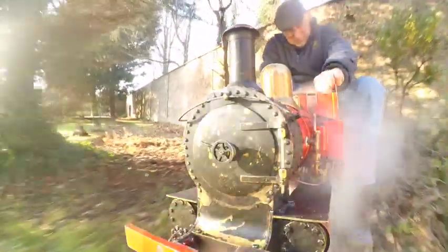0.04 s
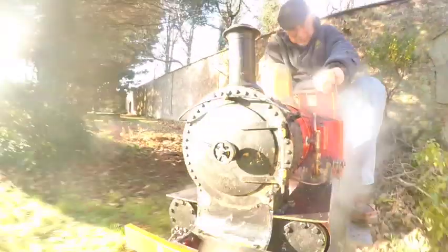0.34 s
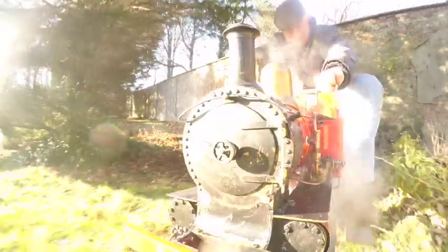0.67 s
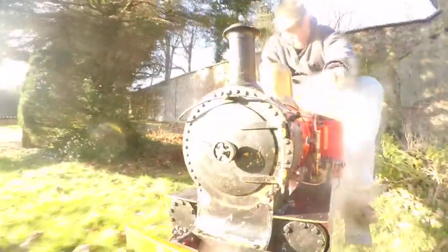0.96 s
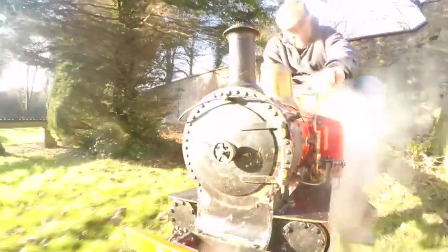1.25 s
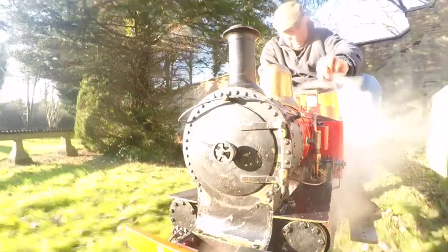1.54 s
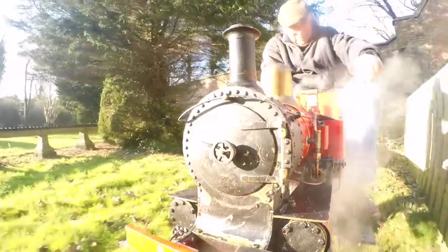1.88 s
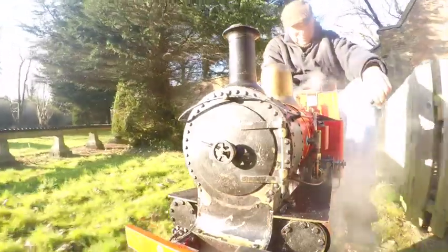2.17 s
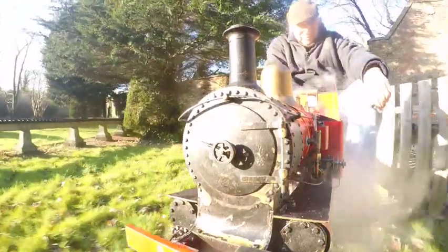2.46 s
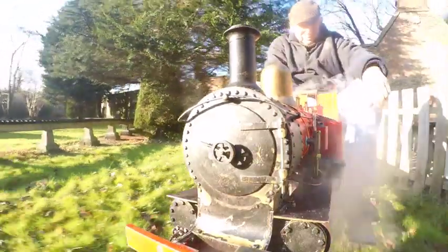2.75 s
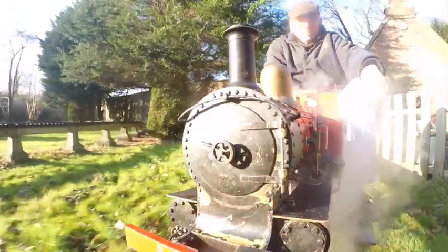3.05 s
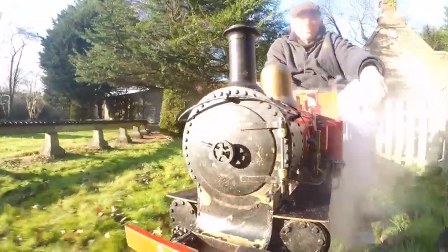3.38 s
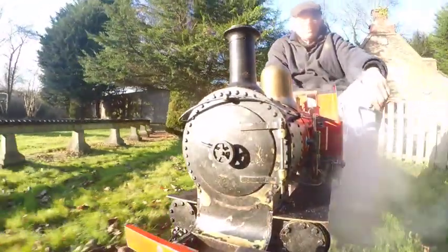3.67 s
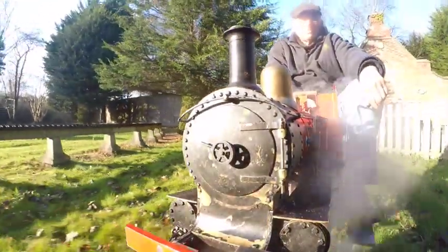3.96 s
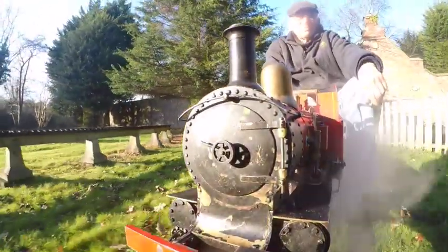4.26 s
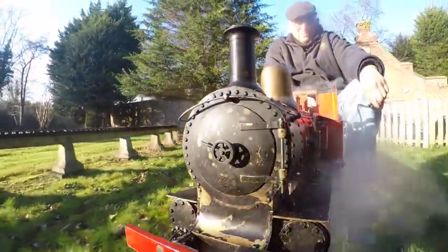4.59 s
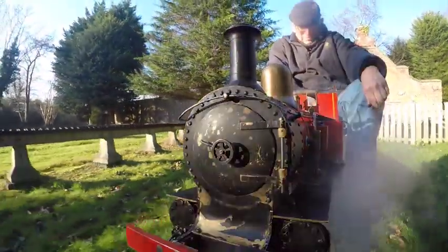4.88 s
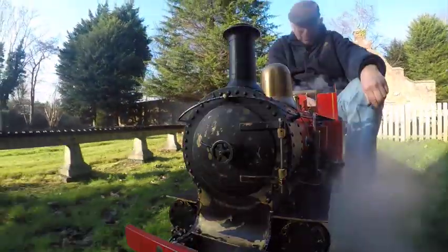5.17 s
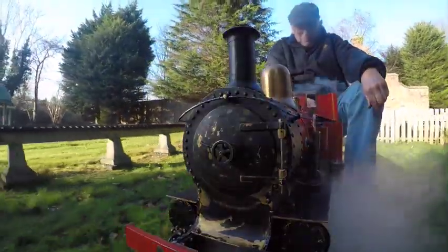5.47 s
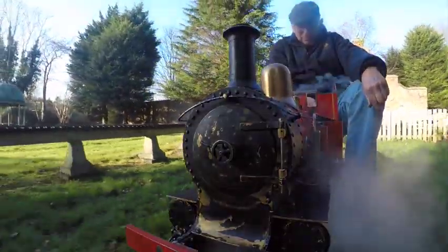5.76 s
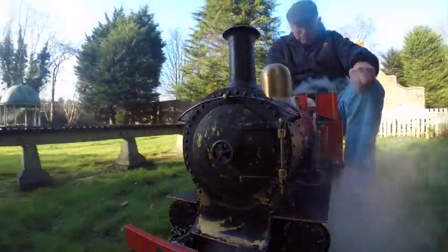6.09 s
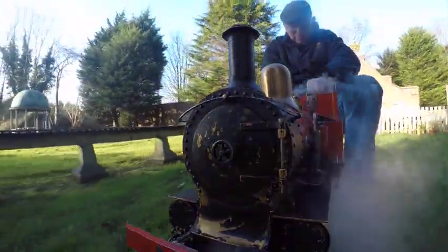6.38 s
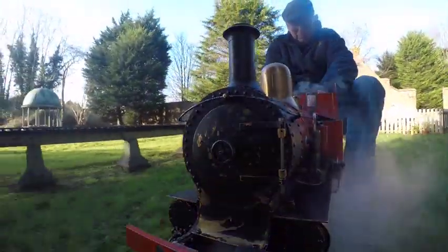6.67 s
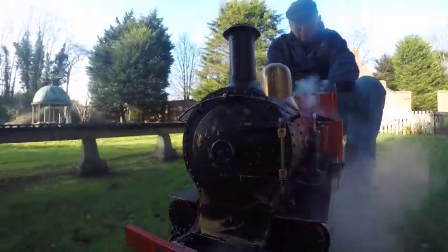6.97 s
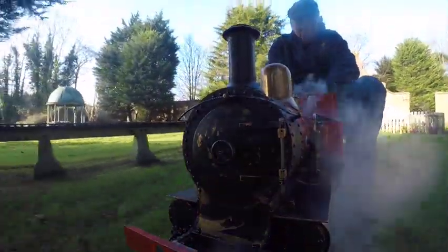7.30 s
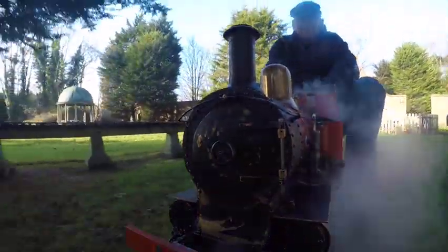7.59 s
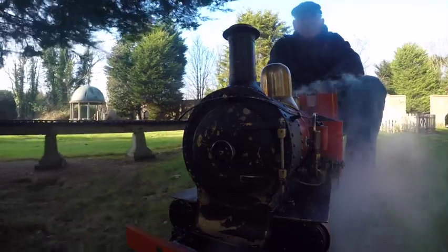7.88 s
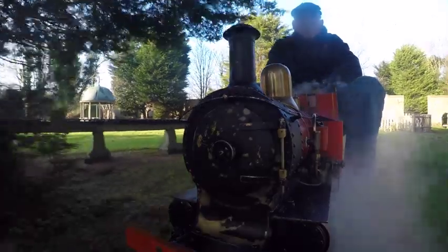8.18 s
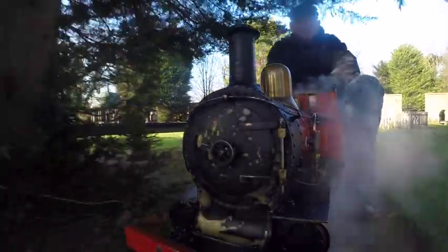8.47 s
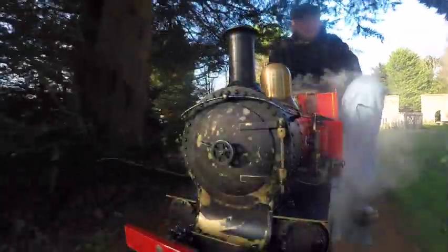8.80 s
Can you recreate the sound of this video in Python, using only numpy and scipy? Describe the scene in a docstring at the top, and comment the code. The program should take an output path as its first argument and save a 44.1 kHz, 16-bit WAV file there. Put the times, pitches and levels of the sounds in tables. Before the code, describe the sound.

A miniature steam locomotive runs along its track, heard very close from its front end. Its pistons knock in a quick, regular rhythm, with rods clanking and valve gear ticking between the beats. Wheels rumble underneath and steam hisses throughout. Bumps rock the engine and a loose fitting clinks now and then. The pace rises slightly, and the hiss swells twice near the end.

```python
"""A miniature steam locomotive runs along its track, heard from its front beam.
From the start, four beats to a wheel turn knock and shake the frame; between them the rods clank and
the valve gear ticks, over rumbling wheels and steam that hisses in time with the strokes.
After a second or so, bumps begin to rock the engine and loose fittings snap now and then.
By the end the pace has risen from about seven beats a second to over eight, and the hiss swells twice."""
import sys
import numpy as np
from scipy import signal
from scipy.fft import rfft, irfft
from scipy.io import wavfile
from scipy.ndimage import uniform_filter1d

SR = 44100
rng = np.random.default_rng(int(sys.argv[2]) if len(sys.argv) > 2 else 0)


def digitize_waveform(pressure):
    """Quantize a signal to 16-bit integers and store it at the path in sys.argv[1].

    Rows of a 2-D input are taken as channels; values are limited to [-1, 1].
    """
    field = np.atleast_2d(pressure).T
    bounded = np.clip(field, -1, 1)
    quanta = np.round(bounded * 32767).astype(np.int16)
    wavfile.write(sys.argv[1], SR, quanta)


N = 389844
TIME = np.arange(N) / SR
SIZE = 16384  # samples in an impulse response
FREQS = np.fft.rfftfreq(SIZE, 1 / SR)


# Modes of a stroke's bright first contact, its damped blow, the frame's low answer and a lingering ring.
# Each row: frequency in Hz, width in Hz, relative level in dB.
TAP_MODES = [(1172, 71, 6.5), (1450, 92, 4), (1780, 120, 1), (1834, 45, 3.5)]
KNOCK_MODES = [(742, 88, 2), (960, 110, -1.5), (1083, 150, 2), (1241, 103, 4.5), (1476, 130, 0),
               (1768, 210, -11), (2444, 112, -12), (3800, 750, -24)]
THUMP_MODES = [(89.5, 8.8, 10), (139, 12, 8.5), (183, 52, 0), (228.6, 29, 4.5), (273.5, 16.6, 9),
               (325.4, 26.4, 5.5), (505, 30, -35)]
RING_MODES = [(1817, 20, 0)]
# How hard the pistons push. Each row: time in seconds, base knock level in dB.
EFFORT = [(0.0, -6.5), (0.17, -14), (0.56, -14), (1.03, -7.5), (1.38, -15), (1.58, -6.5), (1.83, -8.5),
          (2.2, -7), (2.63, -7), (2.86, -20.5), (3.3, -7), (3.62, -12.5), (3.95, -7.5), (4.7, -7),
          (4.9, -18.5), (5.62, -6.5), (6.3, -11.5), (7.46, -13.5), (8.05, -13), (8.45, -8.5), (8.84, -13)]
# The four unequal beats of a wheel turn. Each row: knock in dB over the effort, relative thump in dB.
TURN_ACCENTS = [(-0.9, -11), (0.1, -9), (-1.3, -13.5), (-0.4, -10)]
# Accented strokes. Each row: time in seconds, knock in dB over the effort, relative thump in dB.
HARD_BEATS = [(0.297, 5.5, -6.5), (1.551, -1.5, -5.5), (1.823, 3.5, -8), (2.622, 1.5, -8), (3.301, 2, -5),
              (5.519, -2.5, -4.5), (5.769, 3, -7), (6.262, 5, -16), (6.638, 2, -12), (7.006, 3, -8),
              (7.613, 1, -10), (7.731, -0.5, -7)]

def piston_beats(stroke, lead_s=0.00199, blow_s=0.002982, rebound_s=0.002216, slack_s=0.00021):
    """Impact excitation: each stroke touches, taps, strikes and rebounds, ringing the frame's modes."""
    tap, knock = body(TAP_MODES, skirt=1.9), body(KNOCK_MODES, skirt=2.66)
    thump, ring = body(THUMP_MODES, skirt=1.63), body(RING_MODES, skirt=1.23)
    effort_s, effort_db = np.transpose(EFFORT)
    accents = {round(np.interp(s, TIME, stroke)): accent for s, *accent in HARD_BEATS}
    out = np.zeros(N)
    for beat, s in enumerate(when(stroke)):
        touch_shift, blow_shift, rebound_shift, bounce, push, weight = rng.standard_normal(6)
        accent_db, thump_db = accents.get(beat, TURN_ACCENTS[beat % len(TURN_ACCENTS)])
        knock_db = np.interp(s, effort_s, effort_db) + accent_db + 1.14 * push
        # the harder the stroke, the more its tap and ring stand out
        excess_db = knock_db - effort_db.mean()
        blow = peaked(knock, knock_db) + peaked(ring, knock_db - 19 + 0.13 * excess_db)
        rebound = peaked(knock, knock_db - 9 - 1.5 * bounce)
        add(out, s - lead_s + slack_s * touch_shift, peaked(tap, knock_db - 13))
        add(out, s, peaked(tap, knock_db - 5 + 0.056 * excess_db))
        add(out, s + blow_s + slack_s * blow_shift, blow)
        add(out, s + blow_s + rebound_s + slack_s * rebound_shift, rebound)
        add(out, s + 0.0012, peaked(thump, thump_db + 1 + 2 * weight))
    return out


# Modes of the rods' hollow clatter and of their steel ring.
# Each row: frequency in Hz, width in Hz, relative level in dB.
ROD_MODES = [(290, 49, 0.5), (460, 190, -7.5), (686.5, 104, 8), (760, 25, -11), (935, 15, -0.5),
             (1120, 110, -2), (1237, 64, 1), (1530, 89, -8.5), (1788, 76, -7.5)]
STEEL_MODES = [(2180, 75, -20.5), (2360, 66, 9)]
# The rods slam right through their slack. Each row: time in seconds, relative clatter and ring in dB.
SLAMS = [(0.245, -12, -18), (0.663, -12, -16.5), (1.496, -11, -24), (2.707, -12, -17), (3.787, -9.5, -15.5),
         (4.306, -11, -19), (5.345, -13.5, -14.5), (5.458, -13.5, -28), (6.337, -12.5, -20),
         (6.714, -15, -15), (7.567, -13, -12), (7.685, -12.5, -23), (7.922, -12, -22)]

def rod_clanks(stroke, place=0.565, wander=0.06, lead_s=0.00302, seat_s=0.006):
    """Backlash: in mid-stroke the rods chatter across their slack and seat, harder with speed."""
    rods, steel = body(ROD_MODES, skirt=1.76), body(STEEL_MODES, skirt=1.93)
    regular = []
    for s in when(stroke, place):
        shift, dull, bright = rng.uniform(-1, 1, 3)
        clank_s = s + wander * shift / USUAL_STROKES_PER_S
        speed_db = 3 * haste(s)
        regular.append((clank_s, -18 + speed_db + 3 * dull, -24 + speed_db + 6 * bright))
    out = np.zeros(N)
    for s, clatter_db, ring_db in regular + SLAMS:
        force = undb(-25) * chatter(rise_s=0.0039, fall_s=0.0068, grit=0.66)
        force[int(seat_s * SR)] += 1  # the seating blow
        add(out, s - lead_s, peaked(through(force, rods), clatter_db + 1.5))
        add(out, s - lead_s, peaked(through(force, steel), ring_db - 1.5))
    return out


# Knocks of the worn joints. Each row: share of the stroke, then relative clatter, ring and thump in dB.
JOINT_KNOCKS = [(.085, -32, -30, -34), (.345, -21.5, -28, -30), (.42, -32, -40, -20),
                (.465, -18.5, -31, -28), (.625, -25, -33, -21), (.815, -22.5, -31, -28),
                (.96, -27, -24.5, -34)]

def joint_rattle(stroke, wander_s=0.003003):
    """Clearance impacts: worn joints change sides in turn, each knock a little different."""
    rods = peaked(body(ROD_MODES, skirt=2.82), db=-0.5)
    steel = peaked(body(STEEL_MODES, skirt=1.35), db=-1)
    frame = peaked(body(THUMP_MODES, skirt=1.55), db=0)
    out = np.zeros(N)
    for place, clatter_db, ring_db, thump_db in JOINT_KNOCKS:
        for s in when(stroke, place):
            shift, dull, bright = rng.uniform(-1, 1, 3)
            knock = (rods * undb(clatter_db) + frame * undb(thump_db)) * undb(3 * dull)
            ring = steel * undb(ring_db + 6 * bright)
            add(out, s + wander_s * shift, (knock + ring) * undb(3 * haste(s)))
    return out


# Spectrum of a valve gear tick. Each row: frequency in Hz, relative level in dB.
TICK_SPECTRUM = [(1000, -16), (2500, -12.5), (3600, 9.5), (4800, -10), (7500, -14.5), (9500, -26),
                 (15000, -39)]
# The ticks within a stroke. Each row: share of the stroke, relative level in dB.
VALVE_TICKS = [(.68, 8), (0.768, -10.5), (.91, 6), (.99, -1.5)]

def valve_ticks(stroke, gain_db=-39, scatter_db=2):
    """Phase locking: driven by the crank, the valve gear ticks at the same points of every stroke."""
    response = colour(TICK_SPECTRUM)
    out = np.zeros(N)
    for place, db in VALVE_TICKS:
        for s in when(stroke, place):
            tick = through(chatter(rise_s=0.0012, fall_s=0.0057, grit=0.47), response)
            add(out, s, peaked(tick, db + gain_db + scatter_db * rng.uniform(-1, 1)))
    return out


# Modes of a small loose fitting. Each row: frequency in Hz, width in Hz, relative level in dB.
CLINK_MODES = [(3660, 350, 14), (3940, 310, 10)]
# Spectrum of its thin tick. Each row: frequency in Hz, relative level in dB.
SNAP_SPECTRUM = [(3000, 7), (5500, 8), (7500, 9), (9000, -1), (10700, 5), (13000, -18), (15000, -34)]
# The fittings' snaps. Each row: start in seconds, clink level in dB, tick level in dB.
SNAPS = [(1.383, -15, -39), (1.484, -22.5, -38), (1.564, -20.5, -39), (2.522, -21.5, -29),
         (2.616, -24, -35), (2.627, -27, -42), (5.704, -21, -24.5)]

def fitting_snaps():
    """A brief contact has a broad spectrum: a loose fitting ticks and clinks in its high modes."""
    clink, tick = body(CLINK_MODES, skirt=1.9), colour(SNAP_SPECTRUM)
    out = np.zeros(N)
    for s, clink_db, tick_db in SNAPS:
        force = chatter(rise_s=0.000064, fall_s=0.0015, grit=0.42)
        add(out, s, peaked(through(force, clink), clink_db) + peaked(through(force, tick), tick_db))
    return out


# Frame modes rung by the wheels. Each row: frequency in Hz, width in Hz, relative level in dB.
ROLLING_MODES = [(121, 114, -10.5), (241, 59, -4), (273.3, 27.2, 6), (328.7, 33.3, 3), (450, 77, -10),
                 (492.4, 28, -5.5), (695, 99, -3), (798.4, 10.5, 1.5), (965, 30, -3), (1096, 190, -11.5),
                 (1202, 27, -4.5), (1514, 38, -8), (1824, 94, -9.5), (2107, 66, -9.5), (2326, 195, -12.5)]

def wheel_rumble(stroke, surge_db=2, surge_at=0.49, flicker_db=3):
    """Roughness excitation: gritty rail rings the frame, harder twice a stroke and with speed."""
    grains = gritty_noise(N, grit=0.55)
    axle_load_db = surge_db * np.cos(4 * np.pi * (stroke - surge_at)) + flicker_db * np.tanh(walk(80))
    rumble = through(grains * undb(axle_load_db), body(ROLLING_MODES, skirt=1.86))
    return unit(rumble) * undb(-21 + 1.3 * haste(TIME))


# The two resonances of the low drone, and the engine's slow rocking on the track.
# Each row: frequency in Hz, width in Hz, relative level in dB.
DRONE_MODES = [(81.3, 10.8, 2), (145.9, 8.6, -4.5)]
SWAY_MODES = [(20.9, 11, 2.5), (54, 42, -7.5)]
# Course of the drone. Each row: time in seconds, relative level in dB.
DRONE_LEVEL = [(0.0, -16.5), (0.35, -14), (1.38, -14.5), (2.71, -17), (2.9, -22.5), (3.08, -17),
               (4.05, -20), (4.23, -13), (4.43, -24.5), (4.61, -15), (5.32, -16), (6.05, -18),
               (6.23, -14.5), (6.56, -18.5), (6.74, -14.5), (8.22, -15.5), (8.54, -13), (8.84, -21.5)]
# Bumps in the track. Each row: start in seconds, relative rocking level in dB.
BUMPS = [(1.38, -9.5), (2.49, -10), (2.925, -10), (3.29, -10), (3.585, -8.5), (5.67, -17), (6.64, -13)]

def drone_and_rocking(evenness=0.84, rock_s=0.04):
    """Resonance: a low drone near 81 and 146 Hz swells and fades, and each bump rocks the engine."""
    drone = through(rng.standard_normal(N), body(DRONE_MODES, skirt=1.236))
    drone /= uniform_filter1d(drone ** 2, size=4000) ** (evenness / 2)  # evens out its random swells
    sway = through(rng.standard_normal(N), body(SWAY_MODES, skirt=1.37))
    rocking = undb(-21 + 2 * haste(TIME))
    age = TIME[:SIZE] / rock_s
    for s, rock_db in BUMPS:
        add(rocking, s, undb(rock_db) * age * np.exp(1 - age))
    return unit(drone) * undb(curve(DRONE_LEVEL) - 0.5) + unit(sway) * rocking * undb(-4)


# Resonances of the chimney. Each row: frequency in Hz, width in Hz, relative level in dB.
CHIMNEY_MODES = [(291, 66, 7.5), (1100, 142, 1), (2374, 89, -8)]

def exhaust(stroke, valve_lead_s=0.023, valve_db=-24, scatter_db=3, puff_db=-20):
    """Pipe resonance: the valve clacks just ahead of each beat, then a puff sounds the chimney."""
    frame, chimney = body(KNOCK_MODES, skirt=2.1), body(CHIMNEY_MODES, skirt=2.0)
    out = np.zeros(N)
    for s in when(stroke):
        add(out, s - valve_lead_s, peaked(frame, valve_db + scatter_db * rng.standard_normal()))
        puff = through(chatter(rise_s=0.0021, fall_s=0.013, grit=0.38), chimney)
        add(out, s, peaked(puff, puff_db))
    return out


# Spectrum of the steam jet. Each row: frequency in Hz, relative level in dB.
JET_SPECTRUM = [(1500, -7.5), (2600, -19), (2950, 1), (3100, -4), (3660, 6.5), (4100, 2), (4750, -16),
                (5500, -20), (6200, -27), (7700, -27), (9300, -37), (12000, -33)]
# Modes of the drain cocks. Each row: frequency in Hz, width in Hz, relative level in dB.
DRAIN_MODES = [(5300, 1100, 1.5), (6560, 460, 0.5), (7700, 1100, -3), (11100, 660, -8)]
# Course of the leaking steam. Each row: time in seconds, level in dB.
STEAM_LEVEL = [(0.0, -34.5), (1.2, -35), (2.2, -33.5), (3.0, -35), (4.6, -35.5), (6.8, -35), (7.5, -31.5),
               (7.9, -35), (8.5, -31.5), (8.84, -35.5)]

def steam_leak(stroke, surge_db=1.1, surge_at=0.68, sputter_db=2.33, spit_db=-19, spit_swing_db=3.5):
    """Jet noise: leaking steam swells with each stroke, and water spits through the drain cocks."""
    pressure_db = surge_db * np.cos(2 * np.pi * (stroke - surge_at)) + sputter_db * walk(120)
    jet = through(rng.standard_normal(N) * undb(pressure_db), colour(JET_SPECTRUM))
    drops = gritty_noise(N, grit=0.6) * undb(spit_swing_db * walk(90))
    spit = through(drops, body(DRAIN_MODES, skirt=2.3))
    return (unit(jet) + undb(spit_db) * unit(spit)) * undb(curve(STEAM_LEVEL))


# Speed of the engine. Each row: time in seconds, rate in strokes per second.
SPEED = [(0.0, 7.311), (0.96, 6.993), (1.17, 7.434), (1.37, 7.229), (2.44, 7.629), (2.64, 7.332),
         (3.5, 7.372), (3.7, 7.585), (4.42, 7.784), (4.91, 7.601), (5.9, 8.182), (6.4, 7.959),
         (8.27, 8.609), (8.84, 8.319)]
USUAL_STROKES_PER_S = 7.8

def stroke_count(first_beat_s=0.0228):
    """Phase is the integral of rate: a running count of strokes, with beats at whole numbers."""
    count = np.cumsum(curve(SPEED)) / SR
    return count - np.interp(first_beat_s, TIME, count)


def haste(s):
    """Strokes per second above the usual speed, at time s."""
    return np.interp(s, *np.transpose(SPEED)) - USUAL_STROKES_PER_S


def when(stroke, place=0):
    """Times of equal phase, at which each stroke has run this share of its way."""
    return np.interp(np.arange(int(stroke[-1] - place) + 1) + place, stroke, TIME)


def body(modes, skirt):
    """Impulse response of resonances summed in power; a larger skirt deepens the valleys between."""
    power = 0
    for hz, width, db in modes:
        detuning = (FREQS - hz * hz / (FREQS + 1)) / width
        power += undb(db) ** 2 / (1 + detuning ** 2 / skirt) ** skirt
    return minimum_phase(np.sqrt(power))


def colour(points):
    """Impulse response of a smooth spectrum that rolls off below its first point."""
    hz, db = np.transpose(points)
    gain = undb(np.interp(np.log(FREQS + 1), np.log(hz), db))
    return minimum_phase(gain * np.minimum(FREQS / hz[0], 1) ** 2)


def minimum_phase(gain):
    """Folding the cepstrum gives the promptest impulse response with this spectrum, of energy 1."""
    cepstrum = irfft(np.log(gain + 1e-6))
    cepstrum[1:SIZE // 2] *= 2
    cepstrum[SIZE // 2 + 1:] = 0
    response = irfft(np.exp(rfft(cepstrum)))
    return response / np.sqrt(np.sum(response ** 2))


def through(force, response):
    """Convolution passes a force through an impulse response."""
    return signal.fftconvolve(force, response)[:len(force)]


def gritty_noise(n, grit):
    """Noise with log-normal grain sizes; more grit makes it spikier."""
    return rng.standard_normal(n) * np.exp(grit * rng.standard_normal(n))


def chatter(rise_s, fall_s, grit):
    """A flurry of tiny impulses with a linear rise and an exponential decay."""
    t = TIME[:SIZE]
    return gritty_noise(SIZE, grit) * np.minimum(t / rise_s, np.exp(-(t - rise_s) / fall_s))


def walk(rate_hz):
    """Random levels held for 1 / rate_hz seconds and smoothed twice; spread near 1."""
    hold = int(SR / rate_hz)
    steps = np.repeat(rng.standard_normal(N // hold + 1), hold)
    return 1.3 * uniform_filter1d(uniform_filter1d(steps, hold), hold)[:N]


def curve(table):
    """Linear interpolation of (seconds, value) rows at every sample."""
    return np.interp(TIME, *np.transpose(table))


def add(out, s, wave):
    """Superpose a wave at time s."""
    start = int(np.clip(s * SR, 0, N))
    out[start:start + len(wave)] += wave[:N - start]


def peaked(wave, db):
    """Scale a hit so that its loudest 5 ms have this rms level."""
    return wave * undb(db) / np.sqrt(uniform_filter1d(wave ** 2, size=220).max())


def unit(x):
    """Scale to rms 1."""
    return x / np.sqrt(np.mean(x ** 2))


def undb(db):
    """Decibels to amplitude gain."""
    return 10 ** (np.asarray(db) / 20)


def scene():
    """Superposition: the sources add in one channel, the moving parts timed by one crank phase."""
    stroke = stroke_count()
    gear = piston_beats(stroke) + rod_clanks(stroke) + joint_rattle(stroke)
    clicks = valve_ticks(stroke) + fitting_snaps()
    running = wheel_rumble(stroke) + drone_and_rocking()
    return (gear + clicks + running + exhaust(stroke) + steam_leak(stroke))[None]


# Bands that the front beam and microphone housing absorb. Each row: frequency in Hz, width in Hz.
ABSORBED_BANDS = [(875, 28), (1836, 19), (3885, 72)]

def record(dry, ceiling=0.94, knee=8, top_hz=15250):
    """Absorption notches three bands, soft saturation rounds the peaks, and a low-pass cuts the top."""
    for hz, width in ABSORBED_BANDS:
        dry = signal.lfilter(*signal.iirnotch(hz, hz / width, fs=SR), dry)
    rounded = dry / (1 + abs(dry / ceiling) ** knee) ** (1 / knee)
    return signal.sosfilt(signal.ellip(10, 0.2, 80, top_hz, fs=SR, output="sos"), rounded)


dry = scene()
out = record(dry)
digitize_waveform(out)
```